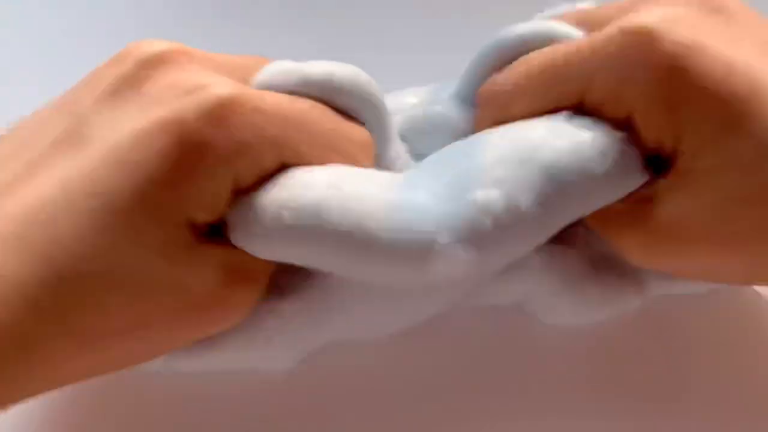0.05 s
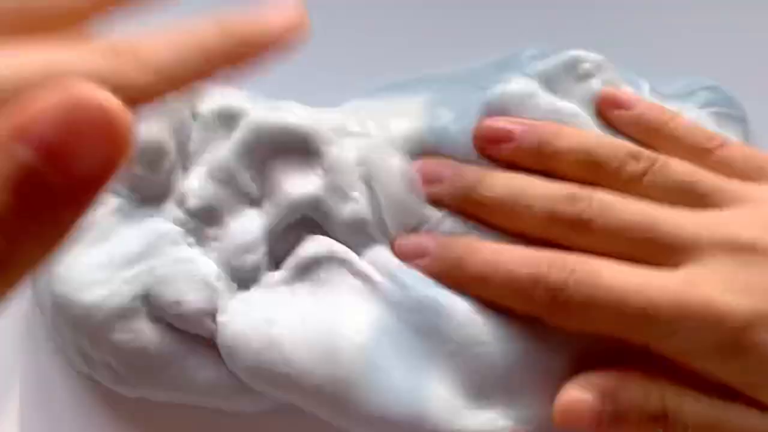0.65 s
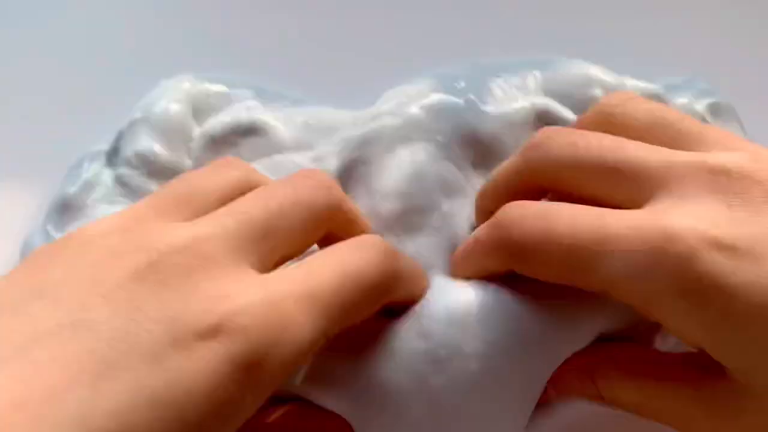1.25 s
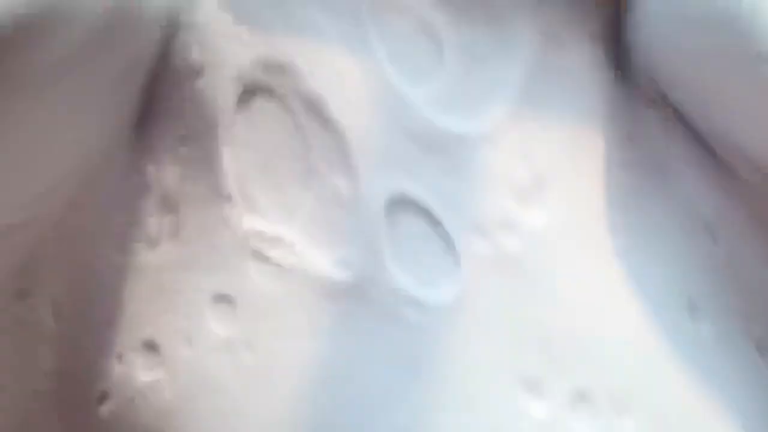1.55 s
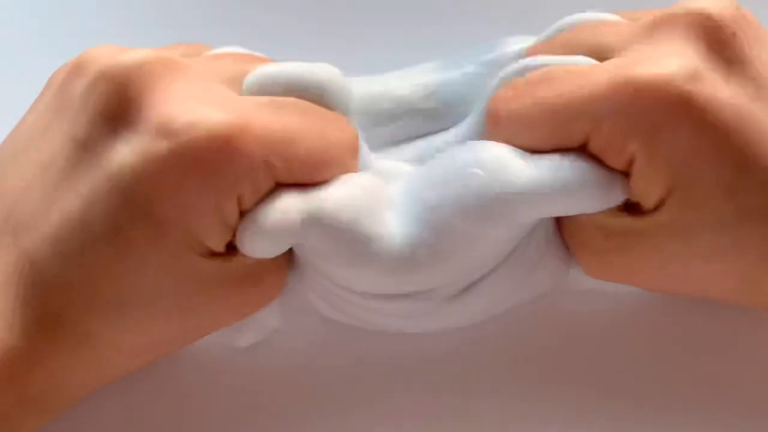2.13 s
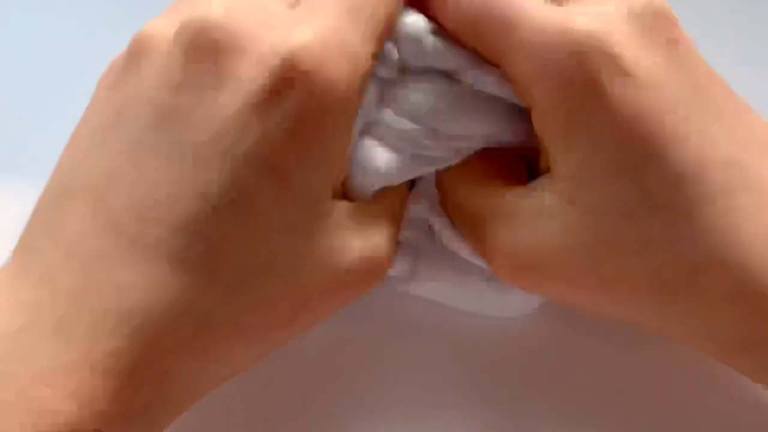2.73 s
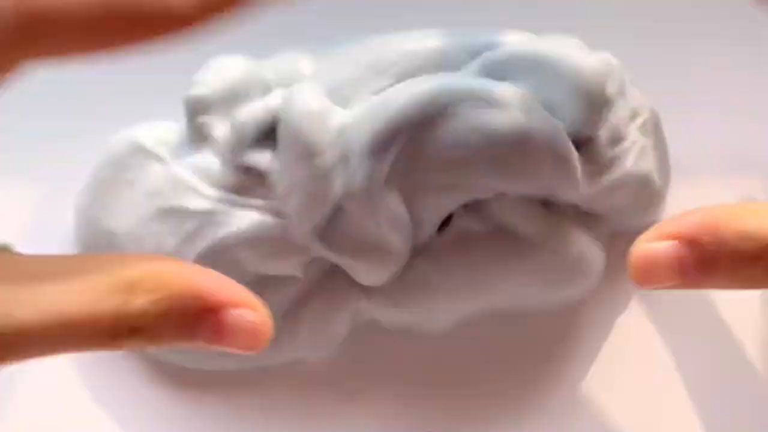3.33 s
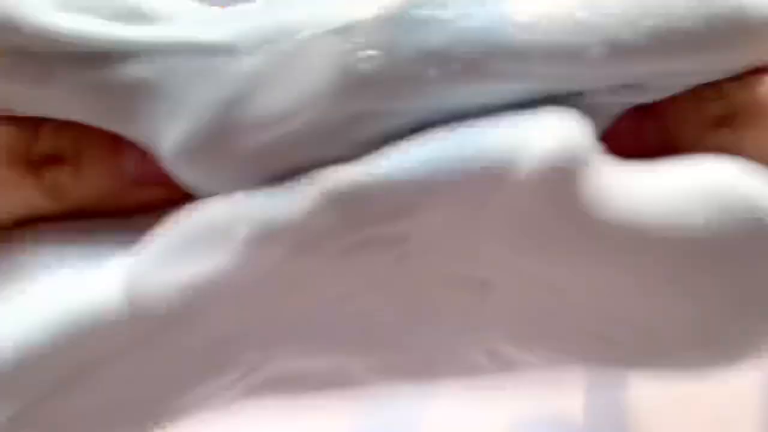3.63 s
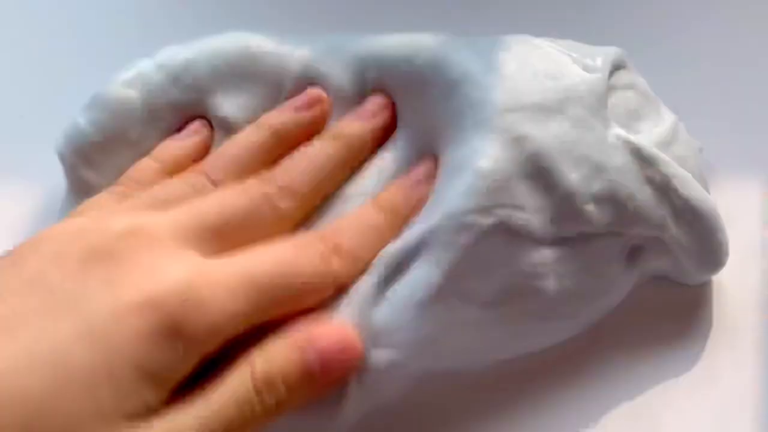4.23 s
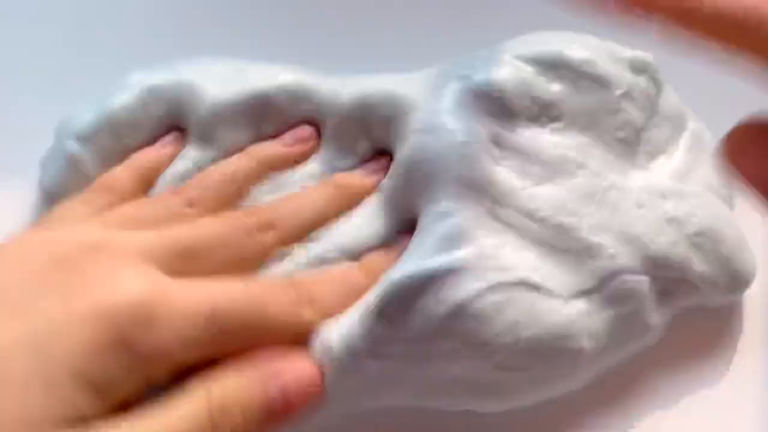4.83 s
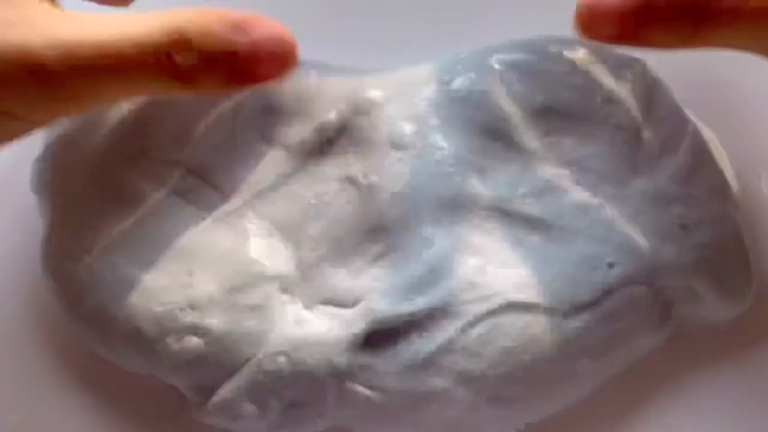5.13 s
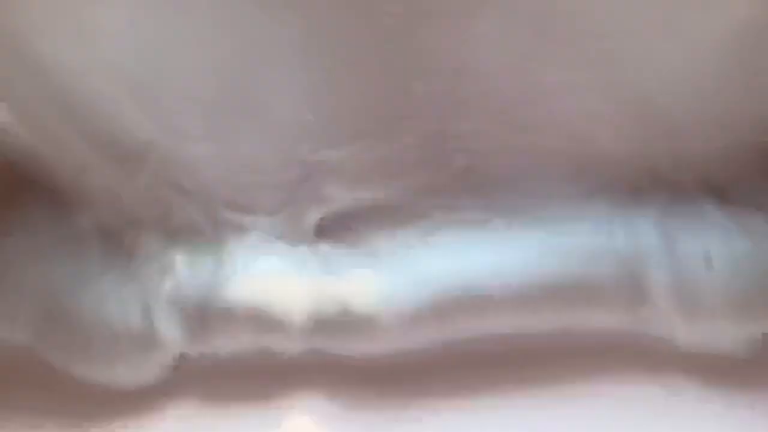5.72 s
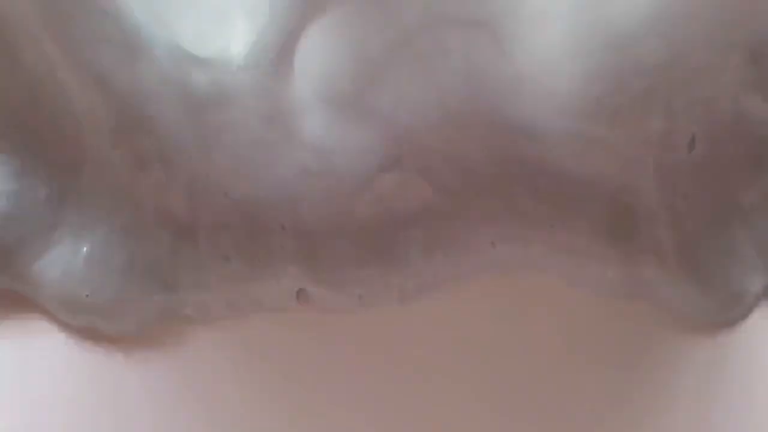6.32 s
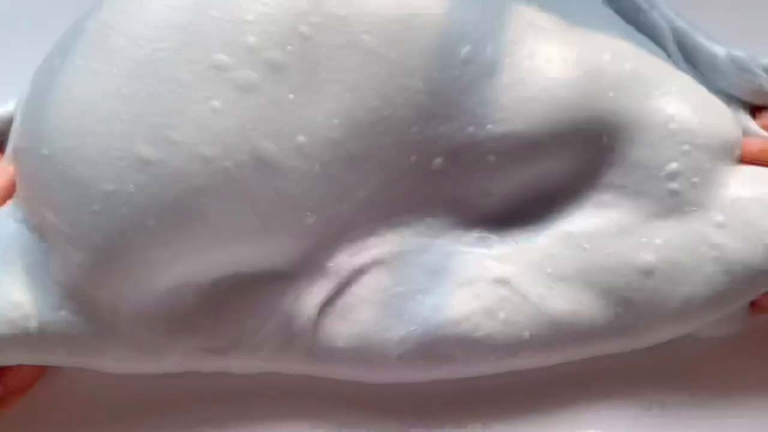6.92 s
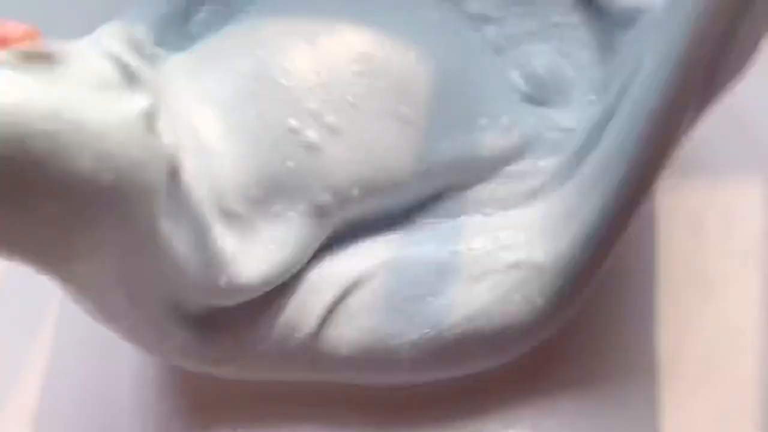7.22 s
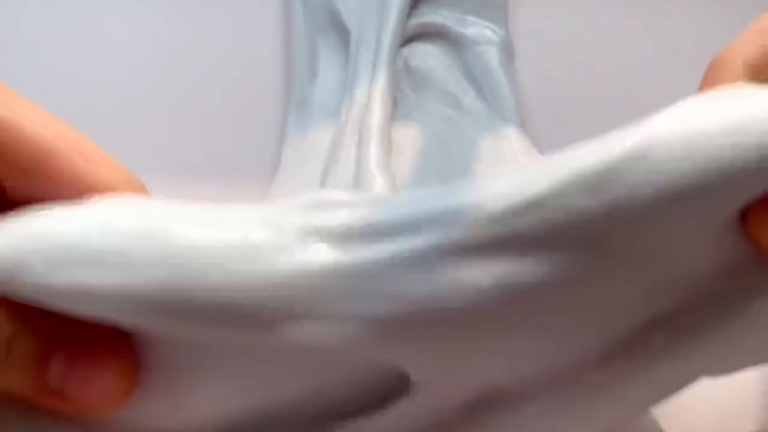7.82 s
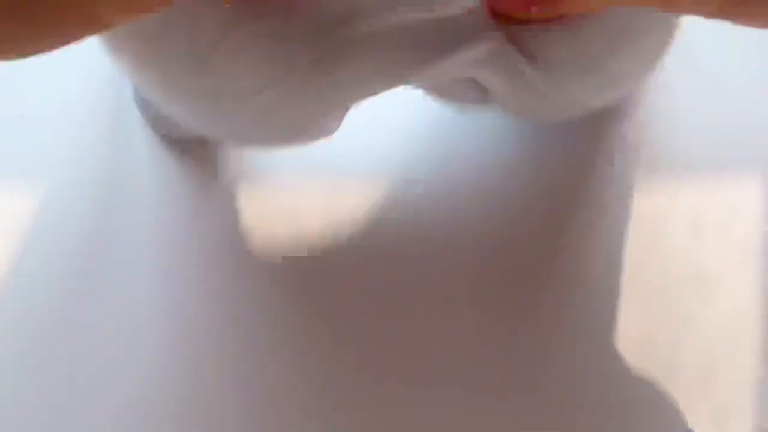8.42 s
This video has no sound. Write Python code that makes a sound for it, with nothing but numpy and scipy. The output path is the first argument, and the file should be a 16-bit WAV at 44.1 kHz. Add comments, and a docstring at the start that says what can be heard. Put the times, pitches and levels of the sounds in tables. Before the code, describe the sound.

Two hands knead, stretch and pat sticky slime on a table, with wet pops, squelches, crackles and quick smacking pats.

```python
"""Soft, sticky clay, kneaded, stretched and patted by two hands on a table in a small quiet room.
Each pat or flop squirts air out through the wet contact, rings the hollow it closes and thumps the table.
In between, the fingers squeeze and pull: air pockets pop, threads snap and the tacky surface crackles."""
import sys
import numpy as np
from scipy import signal
from scipy.fft import rfft, irfft, next_fast_len
from scipy.io import wavfile
from scipy.ndimage import uniform_filter1d, map_coordinates

SR = 44100
rng = np.random.default_rng(int(sys.argv[2]) if len(sys.argv) > 2 else 0)


def master(y):
    """Save y as 16-bit WAV."""
    cut = np.clip(np.atleast_2d(y).T, -1, 1)
    pcm = np.round(cut * 32767)  # scale
    wavfile.write(sys.argv[1], SR, pcm.astype(np.int16))


N = 377496
TIME = np.arange(N) / SR
CONTACT_TIME = TIME[:SR // 5]
LEAD_S = 0.02   # burst start to peak
STEREO_LAG_S = 0.0002116
THREADS_PER_S = 8000

# finger squeezes and pulls: t/s, swell/s, bubble f/Hz, level/dB
SQUEEZES = [(0.001, 0.0077, 568, -40.5), (1.097, 0.015, 750, -39.5), (1.799, 0.048, 615, -51),
            (2.178, 0.022, 630, -48), (2.238, 0.13, 824, -65), (2.689, 0.051, 1790, -54),
            (2.848, 0.022, 1690, -46), (3.046, 0.037, 1640, -57), (3.301, 0.037, 840, -46.5),
            (3.671, 0.015, 1160, -31.5), (5.06, 0.027, 580, -41), (5.594, 0.011, 730, -44),
            (7.105, 0.021, 1470, -51), (7.285, 0.033, 810, -52.5), (7.527, 0.082, 1390, -56.5),
            (7.894, 0.025, 816, -34), (8.147, 0.025, 506, -50.5)]
# larger air pockets bursting: t/s, f/Hz, ring level/dB
POPS = [(0.021, 600, -32), (0.269, 412, -18), (0.427, 360, -27.5), (0.645, 466, -26), (1.115, 755, -37),
        (1.524, 1780, -27), (1.586, 485, -25), (1.637, 1840, -33), (1.758, 377, -37), (1.897, 440, -30),
        (1.924, 430, -24), (2.006, 1850, -40.5), (2.324, 1390, -41.5), (2.344, 1200, -33.5),
        (2.384, 634, -37.5), (2.405, 690, -34.5), (2.475, 550, -32.5), (2.488, 420, -32),
        (2.575, 400, -34.5), (2.729, 580, -41), (2.741, 1960, -32), (2.815, 2220, -35.5), (2.836, 700, -47),
        (3.163, 1370, -35), (3.57, 1300, -44.5), (3.67, 1680, -16.5), (4.307, 376, -15.5),
        (5.039, 317, -34), (5.081, 285, -33), (5.56, 524, -41.5), (5.608, 590, -28), (6.47, 411.3, -24),
        (7.234, 601, -33.5), (7.694, 1010, -49), (7.923, 532, -17.5), (7.95, 1730, -27),
        (8.052, 340, -28.5), (8.181, 513, -41), (8.21, 860, -44.5), (8.3, 846, -49), (8.385, 649, -47.5),
        (8.453, 790, -40.5)]
# table modes: f/Hz, level/dB, t60/s
TABLE_MODES = [(45, -9.5, 1), (61.3, -7, 0.41), (73.5, 6, 0.063), (121.5, -4, 0.3), (164, -12, 0.36)]
# sticky patches leaving the skin: t/s, level/dB
SNAPS = [(0.064, -39.5), (1.21, -38), (1.87, -42), (1.897, -36.5), (1.936, -30.5), (2.057, -40),
         (2.488, -37), (2.519, -29), (3.106, -38.5), (3.141, -43.5), (3.177, -32.5), (3.318, -36.5),
         (3.745, -26), (4.31, -30), (6.459, -29), (7.146, -41), (7.29, -32.5)]
# palm pats, two quick runs: t/s, squirt level/dB, hollow f/Hz
PATS = [(0.182, -11, 326), (0.2592, -11, 414), (0.406, -12.5, 322), (0.4856, -11.5, 372),
        (0.6237, -10, 321), (0.706, -15, 362), (0.8472, -18, 480), (0.912, -19, 410), (4.081, -11, 341),
        (4.183, -20, 346), (4.2945, -15.5, 389), (4.395, -17, 324), (4.4999, -14.5, 378), (4.6, -14.5, 360),
        (4.69, -17, 371), (4.7834, -19.5, 345)]
# peeling crackle, one curve per pull: t/s, level/dB
PULLS = [
    [(1.2, -49), (1.364, -70.5), (1.5, -74.5)],
    [(1.78, -61), (1.835, -44.5), (1.89, -61), (2.16, -63), (2.285, -47), (2.43, -58), (2.526, -54),
     (2.7, -62), (3, -60.5), (3.15, -48.5), (3.27, -82)],
    [(3.305, -55), (3.64, -67)],
    [(5.07, -49.5), (5.2, -70), (5.42, -83)],
    [(6.97, -67.5), (7.25, -67), (7.312, -53.5), (7.37, -67), (7.65, -72.5), (7.75, -82.5)],
    [(8.15, -61.5), (8.53, -71)],
]
# lifted clay falling back: t/s, squirt level/dB, hollow f/Hz, hollow level/dB, thud level/dB
FLOPS = [(1.5966, -18.5, 454, -32.5, -65), (1.657, -22, 486, -14.5, -26.5),
         (3.6693, -30.5, 977, -21.5, -32.5), (3.7225, -21, 615, -30.5, -26.5),
         (6.482, -45, 347, -18.5, -25.5), (7.9656, -24, 647, -28.5, -46), (8.5443, -17.5, 440, -34, -51.5)]
# spectra of wet crackle, smack and room hush: f/Hz, density level/dB
WET_SPECTRUM = [(1500, -1.5), (2700, 2), (5500, -4), (8700, 1.5), (10500, -6), (15500, -5.5)]
SMACK_SPECTRUM = [(300, 7.5), (850, 4.5), (1700, 0), (3200, 0), (6000, -19.5), (14000, -40.5)]
HUSH_SPECTRUM = [(20, -22), (45, 5), (130, -3.5), (300, -16.5), (800, -32.5), (5000, -38.5)]
# room echoes: f/Hz, t60/s, level/dB
ROOM_ECHOES = [(120, 0.14, -4.5), (370, 0.28, -12), (2380, 0.22, -11.5), (12500, 0.16, -23.5)]


def from_db(db):
    """Decibels to gain."""
    return 10 ** (np.asarray(db) / 20)


def rms_one(x):
    """Scale to rms 1."""
    return x / np.sqrt(np.mean(x ** 2) + 1e-20)


def loudest_one(x, size):
    """Scale the loudest `size` samples to rms 1."""
    return x / np.sqrt(uniform_filter1d(x ** 2, size, mode="constant").max() + 1e-20)


def at_hz(points, hz, column=1):
    """Interpolate a column over log frequency."""
    points = np.array(points)
    return np.interp(np.log(hz + 1e-3), np.log(points[:, 0]), points[:, column])


def colour(x, spectrum):
    """Minimum-phase filter with the given spectrum."""
    size = 2 * next_fast_len(x.shape[-1] // 2 + 512, real=True)
    gain = from_db(at_hz(spectrum, np.fft.rfftfreq(size, 1 / SR)))
    cepstrum = irfft(np.log(gain))
    cepstrum[1:size // 2] *= 2
    cepstrum[size // 2 + 1:] = 0
    return irfft(rfft(x, size) * np.exp(rfft(cepstrum)))[..., :x.shape[-1]]


def add(out, sound, start_s):
    """Mix a sound in from start_s on."""
    start = round(start_s * SR)
    first, last = max(start, 0), min(start + sound.shape[-1], N)
    out[..., first:last] += sound[..., first - start:last - start]


def stereo(x, lag_s=STEREO_LAG_S, pan_db=0, split_hz=4600):
    """Lows lead on the left by lag_s and are panned; treble leads on the right."""
    def band(kind):
        sos = signal.butter(2, split_hz, kind, fs=SR, output="sos")
        return signal.sosfilt(np.vstack([sos, sos]), x + 1e-18)

    def delay(v, delay_s):
        return map_coordinates(v, [np.arange(len(v)) - delay_s * SR], order=3)

    low, high = band("low"), band("high")
    left = low * from_db(pan_db / 2) + delay(high, STEREO_LAG_S)
    right = delay(low, lag_s) * from_db(-pan_db / 2) + high
    return np.array([left, right])


def random_lag(x):
    """Spread a sound over both sides, a little louder on the left, with a slightly random delay between them."""
    return stereo(x, STEREO_LAG_S * rng.normal(0.19, 0.6), pan_db=3)


def ring(clicks, hz, t60_s):
    """Resonator: a unit click starts a decaying unit sine."""
    r, w = from_db(-60 / (t60_s * SR)), 2 * np.pi * hz / SR
    return signal.lfilter([0, np.sin(w)], [1, -2 * r * np.cos(w), r * r], clicks + 1e-18)


def grains(per_s, spread_db, size):
    """Random tiny ruptures, most small, a few large."""
    strength = from_db(spread_db * np.minimum(rng.exponential(1, size), 4))
    return (rng.random(size) < per_s / SR) * strength * rng.choice([-1, 1], size)


def hush(level_db=-62):
    """Faint low room noise, mostly common to both sides."""
    air = rng.standard_normal(N) + 0.5 * rng.standard_normal((2, N))
    return from_db(level_db) * rms_one(colour(air, HUSH_SPECTRUM))


def threads(spread_db, size):
    """Fine sticky threads part in a dense crackle."""
    return rms_one(colour(grains(THREADS_PER_S, spread_db, size), WET_SPECTRUM))


def bubbles(hz, size):
    """Tiny bubbles burst in the folds, pitched around hz."""
    pitches_hz = hz * 2 ** np.linspace(-1.1, 1.7, num=12)
    return rms_one(sum(ring(grains(per_s=100, spread_db=3.5, size=size), pitch_hz, t60_s=9 / pitch_hz)
                       for pitch_hz in pitches_hz))


def stick_slip(size, slips_per_s, spread_db=2.5, decay_s=0.0044):
    """Envelope of tacky clay letting go in fits: each slip starts at once and decays."""
    slips = np.abs(grains(slips_per_s, spread_db, size))
    fits = signal.lfilter([1], [1, -np.exp(-1 / (decay_s * SR))], slips)
    return rms_one(fits + 0.5)


def squeezes(squelch_db=2, peel_db=-0.5):
    """Bubbles squelch under each squeeze while threads snap off the skin."""
    t, out = TIME[:SR // 2], np.zeros((2, N))
    for start_s, swell_s, bubble_hz, level_db in SQUEEZES:
        u = t / swell_s
        effort = 2 * u ** 2 / (1 + u ** 4) * np.exp(-u ** 2 / 30)   # fast build, slower release
        peel = from_db(level_db + peel_db) * threads(spread_db=5.5, size=len(t))
        squelch = from_db(level_db + squelch_db) * bubbles(bubble_hz, len(t))
        envelope = effort * stick_slip(len(t), slips_per_s=45)
        add(out, random_lag((squelch + peel) * envelope), start_s)
    return out


def folds(spectrum, ripple_db=3):
    """Folds around a contact add random peaks and dips to its spectrum."""
    hz = np.geomspace(250, 16000, num=48)
    return np.column_stack([hz, at_hz(spectrum, hz) + ripple_db * rng.standard_normal(len(hz))])


def burst(spectrum, rise_s, fall_s, tail_db, tail_s):
    """Crackle swells as a gap closes and drops to a fine tail as it seals."""
    t = CONTACT_TIME - LEAD_S
    swell = np.exp(np.minimum(t / rise_s, -t / fall_s))
    tail = from_db(tail_db) * np.exp(np.minimum(t / rise_s, -t / tail_s))
    ruptures = grains(per_s=9000, spread_db=4.5, size=len(t)) * (swell + tail)
    return loudest_one(colour(ruptures, folds(spectrum)), size=132)


def gurgle(hz):
    """Short wet burst around the pitch of one small pocket."""
    spectrum = [(hz / 2, -14), (hz, 0), (hz * 2, -11), (hz * 10, -45)]
    return burst(spectrum, rise_s=0.0023, fall_s=0.0024, tail_db=-9.5, tail_s=0.0023)


def pocket(hz, t60_cycles, glide, rise_cycles):
    """An air pocket rings briefly, gliding as the clay around it gives."""
    cycles = hz * CONTACT_TIME
    give = np.minimum(cycles / t60_cycles * 2, 1)
    phase = 2 * np.pi * np.cumsum(hz * (1 + glide * (give - 0.25))) / SR
    return np.sin(phase) * from_db(-60 * cycles / t60_cycles) * (1 - np.exp(-cycles / rise_cycles))


def pops(tick_db=-48, tick_db_per_db=1.8, smack_db=-4.5):
    """A pocket's skin tears with a tick and a smack; the air inside rings, falling in pitch."""
    out = np.zeros((2, N))
    mean_db = np.mean([ring_db for _, _, ring_db in POPS])
    for start_s, hz, ring_db in POPS:
        tick = burst(WET_SPECTRUM, rise_s=0.0017, fall_s=0.002, tail_db=-19, tail_s=0.023)
        tick *= from_db(tick_db + tick_db_per_db * (ring_db - mean_db))   # louder pops tear more sharply
        smack = from_db(ring_db + smack_db) * gurgle(hz)
        tone = pocket(hz, t60_cycles=13 * (hz / 1000) ** 0.4, glide=-0.2, rise_cycles=0.25)
        add(out, random_lag(tick + smack), start_s + 0.00084 - LEAD_S)
        add(out, random_lag(from_db(ring_db) * loudest_one(tone, size=176)), start_s)
    return out


def table_thuds(blows, rise_s=0.0018, delay_s=0.0046, low_cut_hz=35):
    """Blows and pops thump the table; the clay softens each and makes the modes wander as it settles."""
    thuds = [(start_s, thud_db) for start_s, *_, thud_db in blows]
    thuds += [(start_s, ring_db - 25 - 9 * np.log2(hz / 350)) for start_s, hz, ring_db in POPS]
    t, out = TIME[:SR * 3 // 4], np.zeros(N)
    attack = np.minimum(t / rise_s, 1)
    for start_s, thud_db in thuds:
        for k, (hz, level_db, t60_s) in enumerate(TABLE_MODES):
            wander = np.interp(t, np.linspace(0, t[-1], num=24), rng.normal(1, 0.12, size=24))
            phase = 2 * np.pi * np.cumsum(hz * wander) / SR
            decay = from_db(thud_db + level_db - 60 * t / t60_s)
            add(out, (-1) ** k * np.sin(phase) * decay * attack, start_s + delay_s)
    # little radiation below the lowest mode
    return stereo(signal.sosfilt(signal.butter(4, low_cut_hz, "high", fs=SR, output="sos"), out))


def snaps(crackle_db=-6.5, smack_db=-2.5):
    """A patch lets go of a finger: crack, crackle and smack, with no air to ring."""
    out = np.zeros((2, N))
    impulse = signal.unit_impulse(len(CONTACT_TIME), round(LEAD_S * SR))
    crack = loudest_one(colour(impulse, WET_SPECTRUM), size=132)
    for start_s, level_db in SNAPS:
        crackle = burst(WET_SPECTRUM, rise_s=0.00031, fall_s=0.0068, tail_db=-30.5, tail_s=0.12)
        smack = burst(SMACK_SPECTRUM, rise_s=0.001, fall_s=0.0077, tail_db=-19.5, tail_s=0.036)
        snap = crack + from_db(crackle_db) * crackle + from_db(smack_db) * smack
        add(out, stereo(from_db(level_db) * snap, STEREO_LAG_S * rng.normal(1, 0.5)), start_s - LEAD_S)
    return out


def pat_blows(mean_smack_db=-26.5, hollow_db=-17.5, flat_thud_db=-21.5, cushion_db=15):
    """Rows for slaps(): harder pats smack louder; the lump cushions the thud until flattened."""
    start_s, squirt_db, hz = np.transpose(PATS)
    smack_db = mean_smack_db + (squirt_db - squirt_db.mean())
    thud_db = flat_thud_db - cushion_db * np.exp(-np.arange(len(PATS)))
    return list(zip(start_s, squirt_db, smack_db, hz, np.full(len(PATS), hollow_db), thud_db))


def slaps(blows, overtone_ratio=2.9, overtone_db=-11):
    """Air squirts out, the wet faces smack together, the closed hollow rings."""
    out = np.zeros((2, N))
    for start_s, squirt_db, smack_db, hz, hollow_db, _ in blows:
        squirt = burst(WET_SPECTRUM, rise_s=0.0024, fall_s=0.0017, tail_db=-18.5, tail_s=0.025)
        smack = burst(SMACK_SPECTRUM, rise_s=0.0037, fall_s=0.0066, tail_db=-14.5, tail_s=0.015)
        overtone_hz = hz * overtone_ratio * rng.normal(1, 0.1)
        overtone = pocket(overtone_hz, t60_cycles=18, glide=-0.052, rise_cycles=0.61)
        fundamental = pocket(hz, t60_cycles=13, glide=-0.23, rise_cycles=0.35)
        hollow = loudest_one(fundamental + from_db(overtone_db) * overtone, size=264)
        lag_s = STEREO_LAG_S * rng.normal(0.9, 0.1)   # the delay between the sides varies a little each time
        add(out, stereo(from_db(squirt_db) * squirt, lag_s), start_s - LEAD_S)
        add(out, stereo(from_db(smack_db) * smack, lag_s, pan_db=9.5), start_s - LEAD_S)
        add(out, stereo(from_db(hollow_db) * hollow, lag_s), start_s + 0.00087)
    return out


def fingers(count=2, level_db=-18, gap_s=0.011, hz=910):
    """After each pat the fingers stick down in turn, each closing a small wet gap."""
    out = np.zeros(N)
    for pat_s, squirt_db, _ in PATS:
        for delay_s in np.cumsum(gap_s * rng.uniform(0.5, 1.5, count)):
            touch = from_db(squirt_db + level_db) * gurgle(hz * 2 ** rng.normal())
            add(out, touch, pat_s + delay_s - LEAD_S)
    return stereo(out)


def rustle(gain_db=5.5, fade_s=0.0037, bubble_db=-6.5, bubble_hz=800):
    """Threads part and bubbles burst while the clay slides over skin and table."""
    envelope = np.zeros(N)
    for pull in PULLS:
        times_s, levels_db = np.transpose(pull)
        touching = np.clip(np.minimum(TIME - times_s[0], times_s[-1] - TIME) / fade_s, 0, 1)
        envelope += touching * from_db(np.interp(TIME, times_s, levels_db))
    crackle = threads(spread_db=2, size=N) + from_db(bubble_db) * bubbles(bubble_hz, N)
    crackle *= stick_slip(N, slips_per_s=54)
    return from_db(gain_db) * envelope * stereo(crackle, STEREO_LAG_S / 2)


def flop_blows():
    """Rows for slaps(): the smack grows with the air expelled and the hollow closed."""
    return [(start_s, squirt_db, (squirt_db + hollow_db) / 2, hz, hollow_db, thud_db)
            for start_s, squirt_db, hz, hollow_db, thud_db in FLOPS]


def table_note(x, hz=337.8, t60_s=0.2, peak_db=-2):
    """The table top answers every close sound with one short note."""
    unity_gain = 2 * np.log(1000) / (t60_s * SR)
    return from_db(peak_db) * unity_gain * ring(x.mean(axis=0), hz, t60_s)


def room(x, width=0.55, first_echo_s=0.004):
    """Near walls echo within milliseconds, dying faster in the treble, a little different per side."""
    t, edges_hz = TIME[:SR // 2], np.geomspace(35, 17000, num=12)
    response = np.zeros((2, len(t)))
    for low_hz, high_hz in zip(edges_hz, edges_hz[1:]):
        hz = np.sqrt(low_hz * high_hz)
        side_gain = width * np.clip(hz / 500, 0.3, 1) * (1 + (600 < hz < 5000))   # widest in the mids
        common = stereo(rng.standard_normal(len(t)), STEREO_LAG_S / 2)
        side = side_gain * rng.standard_normal(len(t)) * [[1], [-1]]
        decay = from_db(-60 * t / at_hz(ROOM_ECHOES, hz)) * (t > first_echo_s)
        band = signal.butter(2, [low_hz, high_hz], "band", fs=SR, output="sos")
        tail = rms_one(signal.sosfilt(band, (common + side) * decay))
        unity_gain = np.sqrt(2 * (high_hz - low_hz) / SR / len(t))
        response += tail * unity_gain * from_db(at_hz(ROOM_ECHOES, hz, column=2))
    return signal.fftconvolve(x[:1], response, axes=1)[:, :N]


def scene():
    """Clay and table close by, plus room echoes and hush."""
    blows = pat_blows() + flop_blows()
    close = slaps(blows) + table_thuds(blows) + fingers() + pops() + snaps() + squeezes() + rustle()
    return hush() + close + table_note(close) + room(close)


def record(dry):
    """Steep low-pass at 16 kHz."""
    return signal.sosfilt(signal.ellip(10, 0.2, 80, 16000, fs=SR, output="sos"), dry)


dry = scene()
out = record(dry)
master(out)
```